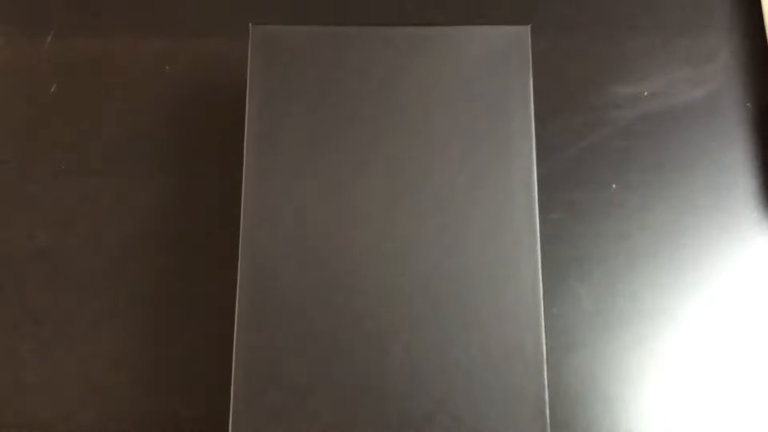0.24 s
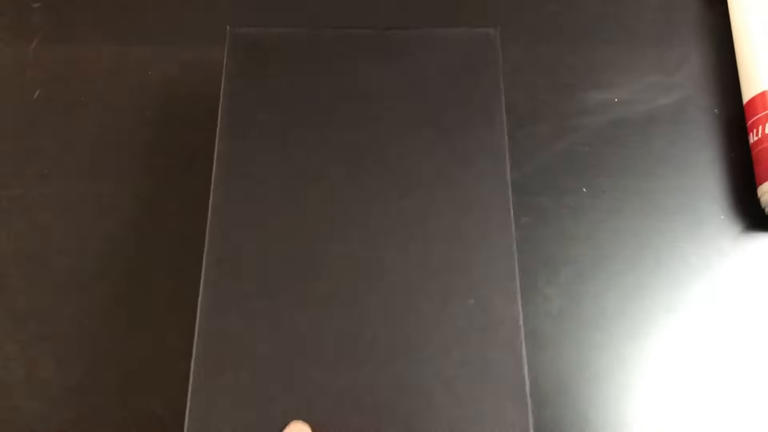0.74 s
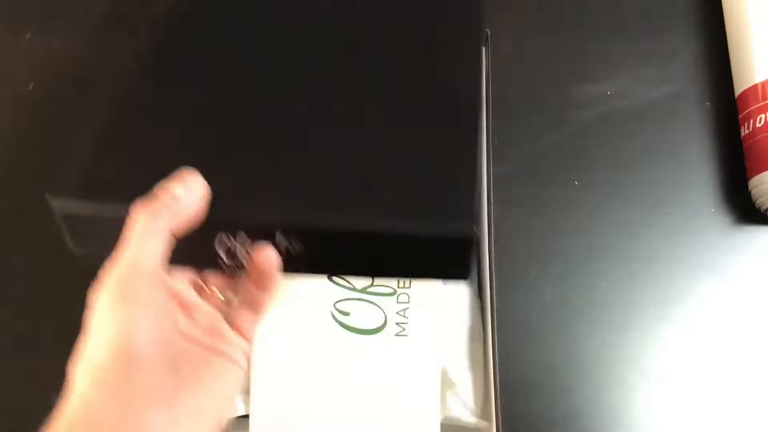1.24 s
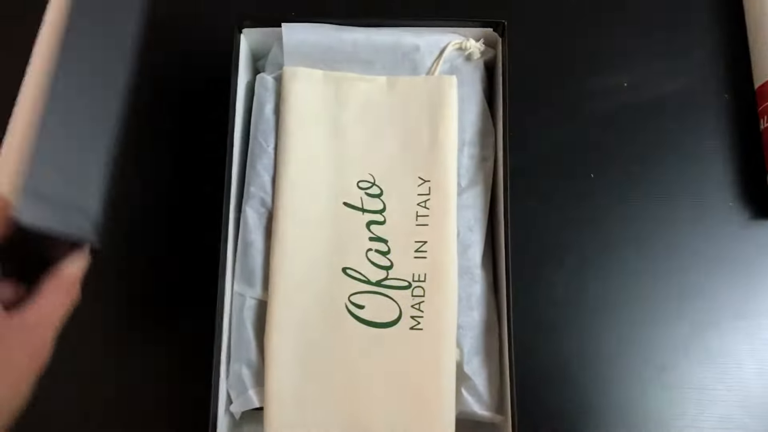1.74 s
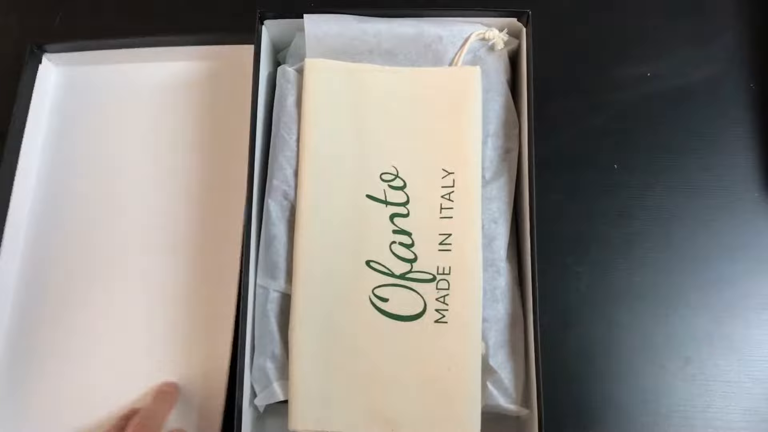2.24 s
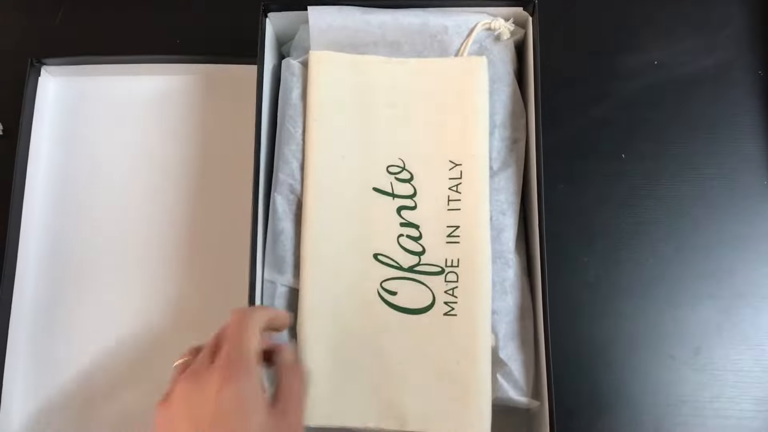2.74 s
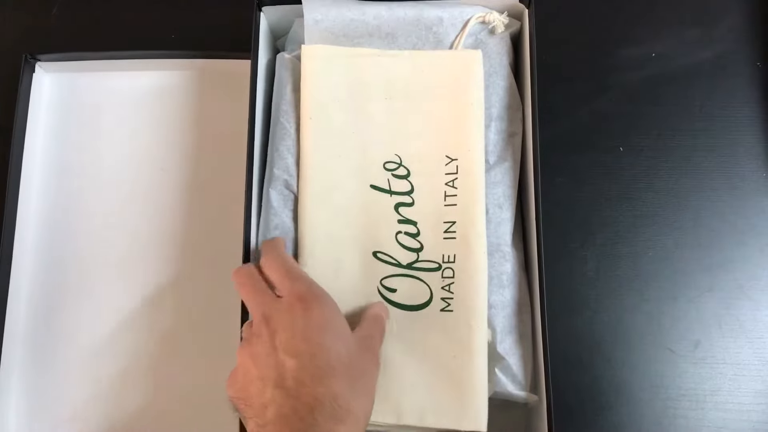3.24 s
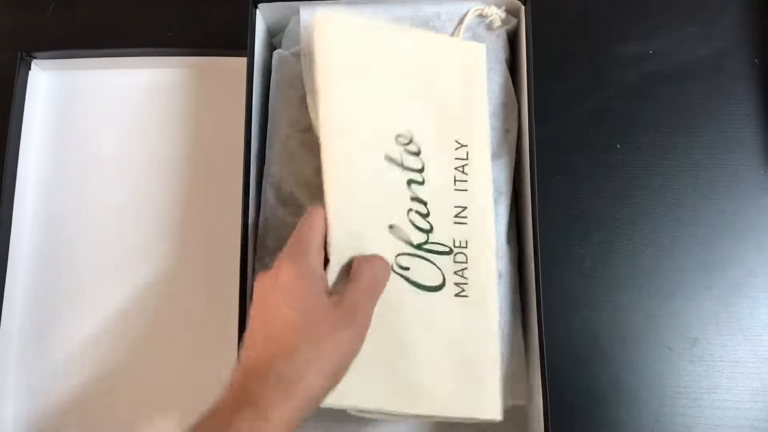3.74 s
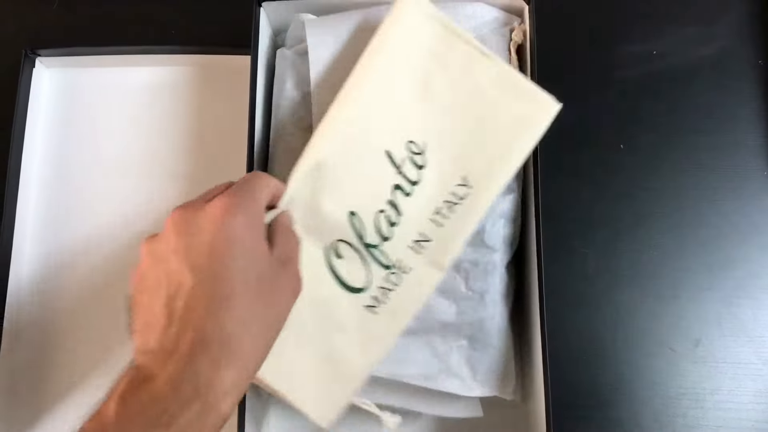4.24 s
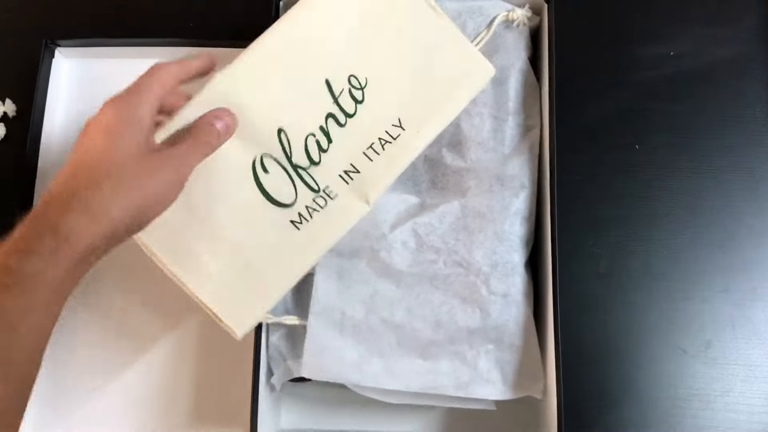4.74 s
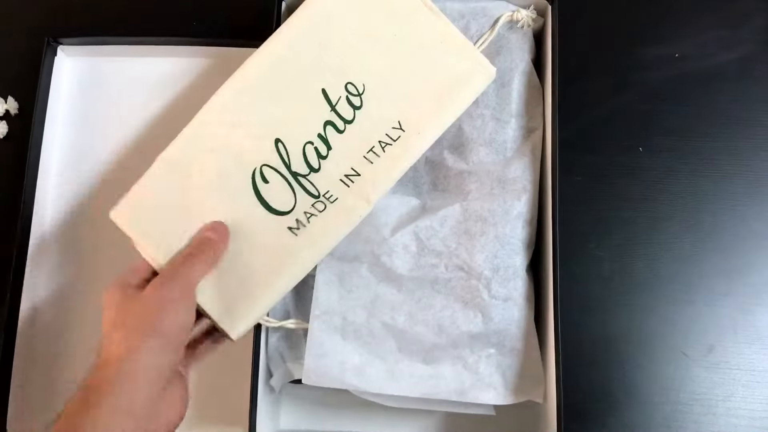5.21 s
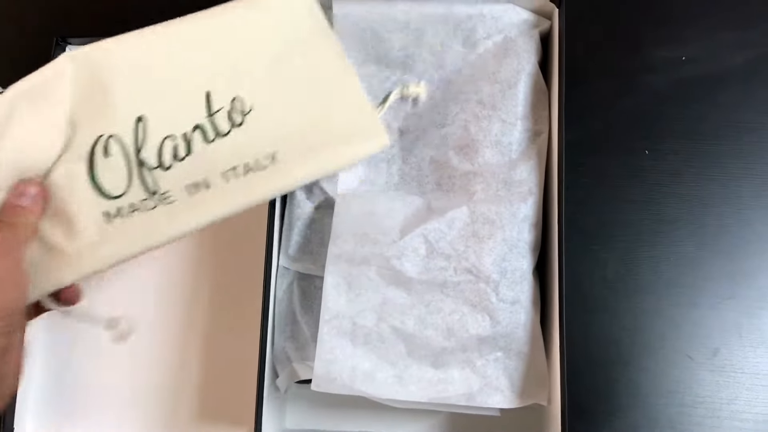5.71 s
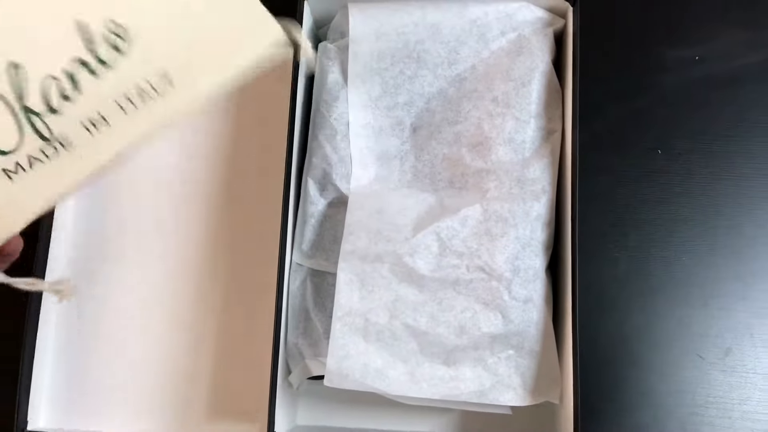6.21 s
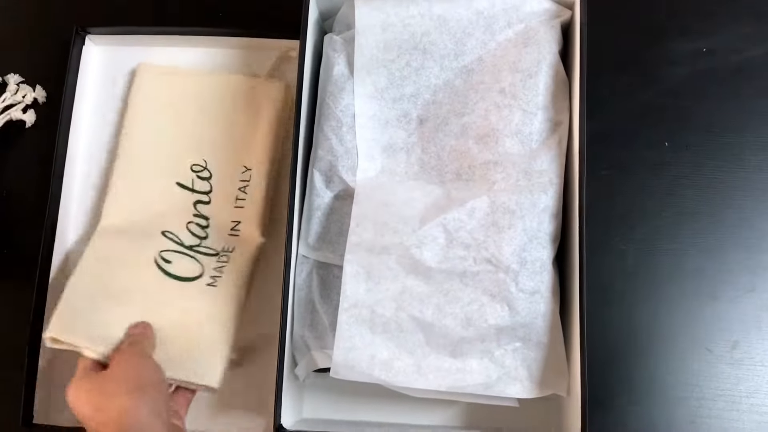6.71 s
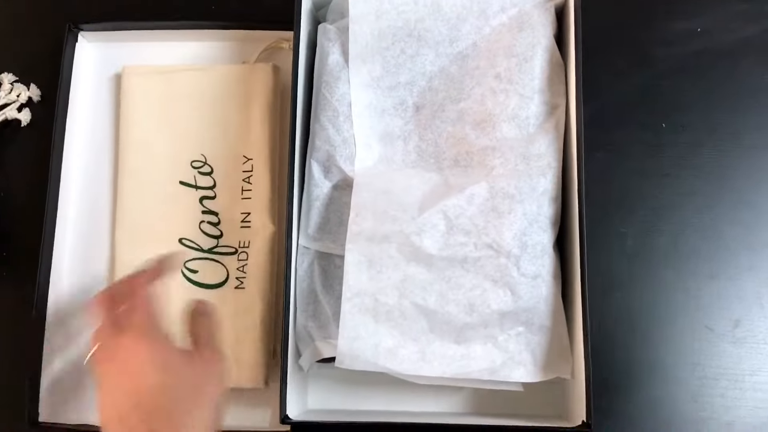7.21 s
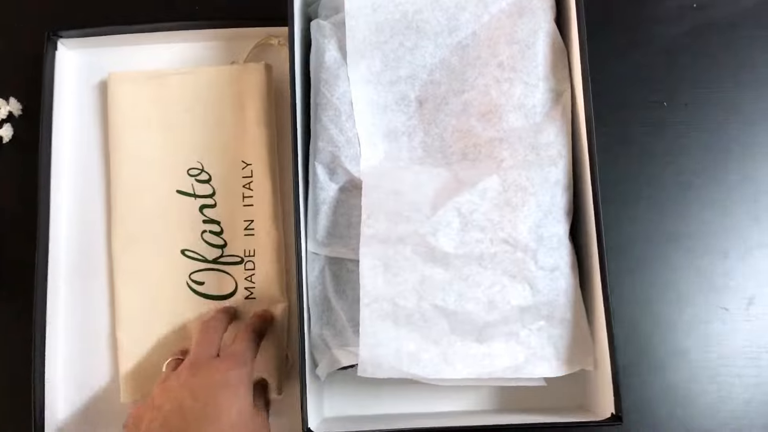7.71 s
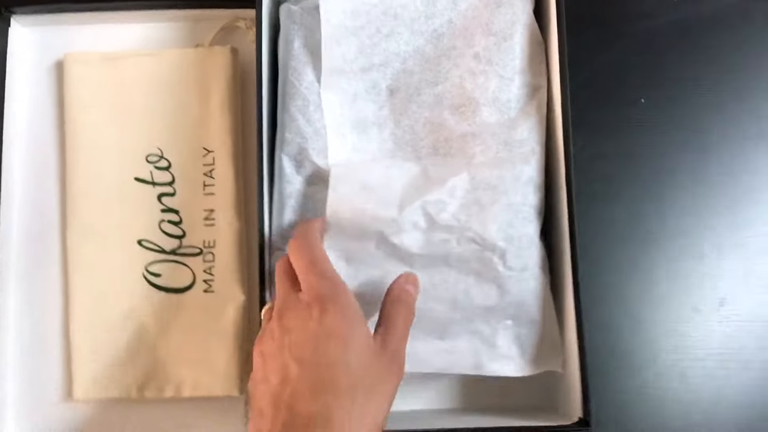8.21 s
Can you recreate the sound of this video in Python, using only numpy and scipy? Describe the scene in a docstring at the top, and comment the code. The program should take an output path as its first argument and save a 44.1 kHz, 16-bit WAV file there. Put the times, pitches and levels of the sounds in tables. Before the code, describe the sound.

A cardboard box lid comes off with hollow knocks, then tissue paper crinkles as a cloth bag is dragged across it.

```python
"""Shoe box and tissue paper

A hand lifts the lid off a cardboard shoe box, sets it on the table, then drags a cloth bag over tissue.
The paper crackles in bursts of tiny creases, dotted with sharp cracks. Knocks and scuffs ring the hollow
box, later the open lid, while the table carries the handling as deep bass. A quiet room answers."""
import sys
import numpy as np
from scipy import signal
from scipy.fft import rfft, irfft
from scipy.io import wavfile
from scipy.ndimage import uniform_filter1d

SR = 44100
rng = np.random.default_rng(int(sys.argv[2]) if len(sys.argv) > 2 else 0)


def bounce(signal):
    """Save signal as a 16-bit WAV file at the path given by the first command-line argument."""
    frames = np.transpose(np.atleast_2d(signal))
    limited = np.clip(frames, -1, 1)
    pcm = np.round(limited * 32767).astype(np.int16)
    wavfile.write(sys.argv[1], SR, pcm)


N = 373086
T = np.arange(N) / SR
LID_OFF_S = 1.6  # here card gives way to tissue, and the closed box to the open lid
TOP_HZ = 15750

# long hand strokes: along the lid, settling it, dragging the bag, lifting it clear, laying it in the lid,
# reaching for the tissue; each is (flutter share/dB, [(t/s, level/dB)])
HAND_STROKES = [(-4.5, [(0.0, -65), (.19, -63.5), (.45, -78), (.75, -59), (1.04, -50), (1.18, -60.5),
                (1.22, -63), (1.6, -77.5)]), (0.5, [(1.98, -75.5), (2.24, -62), (2.75, -82.5),
                (3.22, -82)]), (-6, [(3.27, -53.5), (3.6, -33), (3.8, -40), (4.07, -46), (4.19, -34.5),
                (4.43, -37), (4.45, -50), (4.52, -42.5), (4.64, -45), (4.8, -49), (4.94, -51.5),
                (4.98, -64), (5.11, -78)]), (-10, [(5.28, -84), (5.31, -57), (5.4, -49.5), (5.56, -47),
                (5.9, -52.5), (6.03, -59.5), (6.29, -56.5), (6.34, -95)]), (-1.5, [(6.47, -90), (6.56, -72),
                (6.7, -72)]), (-3.5, [(6.81, -80), (7.75, -81.5), (8.12, -67.5), (8.22, -50.5),
                (8.46, -52.5)])]
# folds giving way in a crunch: (t/s, hold/s, level/dB)
FOLD_CRUNCHES = [(.46, 0.024, -69), (1.3, 0.017, -71), (1.43, 0.012, -63.5), (1.72, 0.011, -71),
                 (1.81, 0.039, -72.5), (2.165, 0.017, -76), (2.315, 0.016, -53.5), (2.47, 0.09, -54.5),
                 (2.57, .03, -50), (2.805, .02, -67), (2.845, 0.025, -63), (2.94, 0.011, -63),
                 (3.0, 0.02, -42.5), (3.115, 0.0092, -57), (3.155, 0.0054, -54.5), (3.305, 0.056, -36),
                 (3.46, 0.064, -36.5), (3.59, .02, -34.5), (3.67, 0.014, -45), (3.72, 0.017, -31.5),
                 (3.775, 0.01, -33.5), (3.83, 0.018, -33), (3.88, 0.015, -31.5), (3.94, 0.049, -27),
                 (4.115, 0.031, -31.5), (4.47, .03, -36), (4.685, 0.005, -39), (4.73, 0.029, -36.5),
                 (5.58, 0.011, -57), (5.675, 0.019, -44), (6.05, .03, -55.5), (6.19, .015, -54),
                 (6.525, 0.047, -63), (8.15, 0.021, -60.5), (8.265, 0.044, -42.5)]
# tone of fingers and lid edge sliding on card: (f/Hz, level/dB)
CARD_EQ = [(350, -28.5), (600, -1), (779, -5), (1160, -1), (1730, -7), (2340, -6), (2700, -13), (3700, -5),
           (4400, -8.5), (4910, -12), (10300, -14), (12800, -15), (16000, -11.5)]
# tone of tissue paper: (f/Hz, level/dB)
TISSUE_EQ = [(90, -30.5), (140, -2.5), (387, -2.5), (456, -5.5), (683, -2.5), (851, -3), (1370, -5),
             (2860, -6.5), (3490, -4.5), (7680, -9), (9400, -6.5), (10300, -11.5), (13100, -6.5),
             (15100, -12), (16000, -3.5)]
# crossovers between patches of the sheet, large to small: f/Hz
PATCH_EDGES = [900, 1400, 1900, 2500, 3200, 4000, 5000, 6500, 8500, 11500]
# fingers and cloth scuffing the cardboard: (t/s, hold/s, level/dB)
CARD_SCUFFS = [(0.0, 0.24, -60.5), (.5, 0.29, -59.5), (.85, 0.24, -45.5), (2.24, 0.21, -45.5),
               (2.8, 0.24, -63.5), (3.5, 0.53, -55.5), (4.15, .3, -61.5), (4.75, .22, -67),
               (5.42, 0.21, -62.5), (6.3, 0.06, -61), (7.56, 0.065, -68), (8.0, .4, -68.5)]
# modes of the closed box: (f/Hz, level/dB, free t60/s)
BOX_MODES = [(138, -2, 0.28), (180, -5, 0.37), (241, 1.5, 0.15), (336.3, 0, 0.23), (494, -4, 0.12),
             (576, -4, 0.045), (877, -22, 0.15), (1120, -37, 0.068)]
# modes of the lid on the table: (f/Hz, level/dB, free t60/s)
LID_MODES = [(142.3, -6.5, 0.46), (177.5, -6.5, 0.38), (220.7, -1.5, 0.19), (245, -14, 0.069),
             (267.8, -3.5, 0.21), (325.8, -4.5, 0.3), (398, -10, 0.11), (389.9, 2.5, 0.25),
             (477.5, -9, 0.22873), (524, -10.5, 0.56), (597, -3.5, 0.23), (683, -0.5, 0.16),
             (876, -7, 0.36), (1080, -2.5, 0.091), (1320, -24, .15), (1503, -20, 0.097),
             (1722, -28, 0.14574)]
# tone of the quiet room: (f/Hz, level/dB)
AIR_EQ = [(15, -45.5), (25, 10), (59, -0.5), (277, -9), (354, -5), (531, -22), (840, -20.5), (1290, -19.5),
          (1790, -23), (6210, -30), (10400, -32.5), (14000, -29.5), (16000, -36.5)]
# blows on the cardboard: (t/s, level/dB, favoured f/Hz, share of free t60, slap offset/dB, slap f/Hz)
CARD_KNOCKS = [(.211, -30.5, 295, 0.26, -12.5, 524), (.698, -42, 284, 0.57, -7, 900),
               (.742, -38, 150, 0.7, -8, 1290), (.849, -23.5, 244, 0.44, -16, 800),
               (.857, -19.5, 246, 0.24, -10, 764), (.898, -17.5, 237, 0.7, -14, 835),
               (.913, -20, 181, 0.3, -29, 1040), (.926, -20, 326, 0.55, -33, 850),
               (2.034, -6.5, 372, 0.16, -12, 1690), (2.047, -12, 230, 0.75, -10.5, 1200),
               (2.326, -22.5, 197, 0.33, -12.5, 1057), (2.455, -35, 395, 1, -3.5, 810),
               (2.544, -28.5, 397.7, 0.65, 1, 990), (2.563, -23, 355, 1, 0.5, 945),
               (2.576, -10.5, 370, 0.14, -7, 1150), (2.588, -11, 284, 0.5, -10, 1100),
               (2.811, -38, 150, 0.4, -2, 900), (2.837, -37, 268, 0.57, 3, 1120),
               (2.886, -42.5, 180, 0.22, -14, 800), (3.304, -39, 623, 0.34, 10.5, 1600),
               (5.496, -38, 703, 0.35, 1, 910), (6.332, -38, 550, 0.43, -2, 830),
               (6.49, -27.5, 390, 0.43, -4.5, 1450), (6.524, -39.5, 378, 1, 1.5, 1350),
               (7.61, -49.5, 387, 1, -8, 812.4), (8.091, -46.5, 139, 0.4, -14, 886),
               (8.245, -43, 620, 0.15, 4.5, 800)]
# handling bumps through the table: (t/s, hold/s, level/dB)
TABLE_BUMPS = [(.7, .1, -53), (.85, 0.045, -43), (1.12, 0.027, -55), (2.04, .03, -47), (2.42, 0.05, -62),
               (2.83, 0.054, -51.5), (3.28, 0.099, -53.5), (3.55, 0.046, -49), (4.5, .05, -71),
               (5.44, 0.067, -61), (8.25, 0.032, -59.5)]
# sharp cracks in the tissue, crease snaps and sudden starts of crackle bursts: (t/s, level/dB, centre f/Hz)
TISSUE_CRACKS = [(2.0331, -39.5, 9000), (2.3213, -41, 3530), (2.5114, -36.5, 7640), (2.5754, -36, 3280),
                 (2.5875, -42, 6000), (2.8358, -39.5, 3130), (3.0027, -23.5, 5210), (3.0071, -26, 3170),
                 (3.273, -36, 3625), (3.3036, -21, 3960), (3.321, -26, 3240), (3.34, -36, 3360),
                 (3.3614, -25.5, 3150), (3.4336, -32, 4010), (3.463, -26.5, 3280), (3.5964, -24.5, 3540),
                 (3.6701, -24, 5380), (3.68, -24, 4270), (3.69, -28, 3958), (3.7264, -19, 3345),
                 (3.8295, -30, 3480), (3.8796, -31, 8570), (3.9014, -25, 3390), (3.9345, -20, 3720),
                 (4.116, -28, 5150), (4.2242, -24.5, 3450), (4.3332, -23.5, 9555), (4.3535, -29, 3510),
                 (4.389, -24, 4000), (4.4243, -23.5, 3582), (4.466, -21.5, 4140), (4.595, -28, 4530),
                 (4.638, -29.5, 5270), (4.7346, -23, 8500), (4.7945, -30, 3420), (4.8944, -36, 4040),
                 (5.5842, -30, 5721), (5.6652, -36, 5830), (5.681, -28.5, 4020), (5.9216, -34.5, 3959),
                 (6.0418, -43, 5140), (6.0553, -32.5, 10920), (6.0644, -36.5, 2200), (6.0901, -30.5, 6070),
                 (6.1937, -31.5, 4214), (8.1558, -31.5, 5500), (8.2714, -33, 3760), (8.304, -27, 4230),
                 (8.3379, -24.5, 9500), (8.3589, -28.5, 3570)]
# reverb time of the room: (f/Hz, t60/s)
ROOM_DECAY = [(150, 0.31), (1000, 0.58), (4000, 0.35), (12000, 0.35)]


def undb(db):
    """Decibels to gain."""
    return 10 ** (np.asarray(db) / 20)


def unit(x):
    """Scale to rms 1."""
    return x / np.sqrt(np.mean(x ** 2))


def decay(t, t60):
    """Envelope that falls 60 dB in t60 seconds."""
    return 1000 ** (-t / t60)


def add(out, start_s, x):
    """Mix in a one-shot."""
    i = int(start_s * SR)
    out[i:i + len(x)] += x[:N - i]


def filtered(x, kind, hz, order=2):
    """Butterworth low-, high- or band-pass."""
    return signal.sosfilt(signal.butter(order, hz, kind, fs=SR, output="sos"), x)


def eq(x, points):
    """Minimum-phase EQ through (f/Hz, level/dB) points."""
    size = 4096
    hz, db = np.transpose(points)
    f = np.arange(size // 2 + 1) * SR / size + 1
    cepstrum = irfft(np.interp(np.log(f), np.log(hz), db) * np.log(10) / 20)
    cepstrum[1:size // 2] *= 2
    cepstrum[size // 2 + 1:] = 0
    return signal.fftconvolve(x, irfft(np.exp(rfft(cepstrum))))[:len(x)]


def fader(points):
    """Automation curve through (t/s, value) points."""
    return np.interp(T, *np.transpose(points))


def wander(rate_hz):
    """Glides between random values, rms 1."""
    step = int(SR / rate_hz)
    held = np.repeat(rng.standard_normal(N // step + 1), step)
    return unit(uniform_filter1d(held, step)[:N])


def swells(events, rise_db_per_s, fall_db_per_s, rest_db):
    """Level in dB of events that rise, hold and fall over a resting level."""
    power = undb(2 * rest_db) * np.ones(N)
    for start_s, hold_s, db in events:
        near = slice(max(int((start_s - 1) * SR), 0), int((start_s + hold_s + 1) * SR))
        t = T[near] - start_s
        drop_db = np.maximum(-rise_db_per_s * t, fall_db_per_s * (t - hold_s))
        power[near] += undb(2 * (db - np.maximum(drop_db, 0)))
    return 10 * np.log10(power)


def burst(envelope, hz, span, click):
    """A click and shaped noise in the band hz / span to hz * span; peak 1."""
    noise = envelope * rng.standard_normal(len(envelope))
    noise[1] += click
    noise = filtered(noise, "band", [hz / span, min(hz * span, TOP_HZ)])
    return noise / np.abs(noise).max()


def crackle(per_s, spread_db, tail_s, burst_db, slide):
    """Creases of very unequal size, each with a noisy tail, over a sliding hiss; all in bursts."""
    onsets = rng.random(N) < per_s / SR
    size_db = spread_db * np.minimum(rng.exponential(size=N), 4.8)
    power = signal.lfilter([1], [1, -np.exp(-2 / (tail_s * SR))], onsets * undb(2 * size_db))
    envelope = np.sqrt(power / power.mean() + slide)
    return envelope * undb(burst_db * wander(rate_hz=45)) * rng.standard_normal(N)


def patches(x, depth_db, rate_hz):
    """Patches of the sheet work unevenly, so the colour keeps shifting."""
    lows = [signal.sosfiltfilt(signal.butter(2, hz, fs=SR, output="sos"), x) for hz in PATCH_EDGES]
    bands = np.diff([0 * x, *lows, x], axis=0)
    return sum(undb(depth_db * wander(rate_hz)) * band for band in bands)


def rustle():
    """Strokes and crunching folds crackle on card, then tissue; the harder, the brighter."""
    stroke_db = fader([point for _, stroke in HAND_STROKES for point in stroke])
    level_db = swells(FOLD_CRUNCHES, rise_db_per_s=506.5, fall_db_per_s=301.5, rest_db=stroke_db)
    share_db = fader([(s, db) for db, stroke in HAND_STROKES for s, _ in stroke])
    flutter_db = np.minimum(share_db - 0.27 * (level_db + 61), 4.5)  # loud strokes thin the low flutter
    grain = crackle(per_s=700, spread_db=3, tail_s=0.00084, burst_db=2.1, slide=0.8)
    grain = patches(grain, depth_db=3.5, rate_hz=14)
    grain = np.where(T < LID_OFF_S, unit(eq(grain, CARD_EQ)), unit(eq(grain, TISSUE_EQ)))
    flutter, crisp = (unit(filtered(grain, kind, hz=2700)) for kind in ("low", "high"))
    return undb(level_db) * (crisp - undb(flutter_db) * flutter)  # minus: no notch at the crossover


def ring(modes, favour_hz, t60_share, focus_db):
    """Hollow ring of struck card; the spot touched favours one pitch, by focus_db an octave."""
    t, out = T[:SR // 2], 0
    scatter_db, detune = 1.5, 0.007  # no two touches ring alike
    for hz, db, free_t60 in modes:
        weight, shift, polarity = rng.standard_normal(3)
        octaves_off = min(abs(np.log2(hz / favour_hz)), 1.5)
        gain = np.sign(polarity) * undb(db + scatter_db * weight - focus_db * octaves_off)
        tone = np.sin(2 * np.pi * hz * (1 + detune * shift) * t)
        out += gain * tone * decay(t, np.clip(t60_share * free_t60, 0.01, 0.4))
    return out


def scuffs():
    """Grainy friction of fingers and cloth rings the closed box, later the open lid."""
    rub = crackle(per_s=300, spread_db=2.2, tail_s=0.0039, burst_db=1.4, slide=0.94)
    box = signal.fftconvolve(rub, ring(BOX_MODES, favour_hz=328, t60_share=0.55, focus_db=11))[:N]
    lid = signal.fftconvolve(rub, ring(LID_MODES, favour_hz=390, t60_share=0.55, focus_db=11))[:N]
    level_db = swells(CARD_SCUFFS, rise_db_per_s=140.5, fall_db_per_s=89, rest_db=-78)
    return undb(level_db) * np.where(T < LID_OFF_S, unit(box), unit(lid))


def room_tone():
    """A steady bed of low air and faint hiss."""
    air = eq(rng.standard_normal(N), AIR_EQ)
    return undb(-65) * unit(filtered(air, "high", hz=40))


def knocks():
    """Each blow rings the box or lid and slaps its flat face, whose dense modes die as noise."""
    out, t = np.zeros(N), T[:SR // 5]
    push = np.hanning(int(0.00073 * SR))  # soft contact, just under a millisecond
    for start_s, db, favour_hz, t60_share, slap_db, slap_hz in CARD_KNOCKS:
        modes = BOX_MODES if start_s < LID_OFF_S else LID_MODES
        body = signal.fftconvolve(ring(modes, favour_hz, t60_share, focus_db=8), push)
        add(out, start_s, undb(db) * body / np.abs(body).max())
        envelope = np.minimum(t / 0.0011, 1) * (decay(t, 0.021) + 0.36 * decay(t, 0.5 * t60_share))
        slap = burst(envelope, slap_hz, span=1.52, click=1.2)
        slap = filtered(slap, "low", hz=3600)  # card is too soft to slap in the treble
        add(out, start_s, undb(db + slap_db) * slap)
    return out


def table_bumps():
    """The table carries the handling as soft, wavering deep bass."""
    level_db = swells(TABLE_BUMPS, rise_db_per_s=400, fall_db_per_s=154.5, rest_db=-73)
    level_db += 2.8 * wander(rate_hz=4.3)
    return undb(level_db) * unit(filtered(rng.standard_normal(N), "band", hz=[42, 85]))


def cracks():
    """A sharp crack as a crease snaps or a crackle burst starts, then the sheet shivers."""
    out, t = np.zeros(N), T[:SR // 10]
    envelope = np.minimum(t / 0.0012, 1) * (decay(t, 0.016) + 0.19 * decay(t, 0.04))
    for start_s, db, hz in TISSUE_CRACKS:
        add(out, start_s, undb(db) * burst(envelope, hz, span=2.9, click=1.6))
    return out


def reverb(x):
    """The room answers with a short noise tail that hangs longest in the mids."""
    t, tail = T[:SR // 2], 0
    f, t60 = np.transpose(ROOM_DECAY)
    for hz in 60 * 2. ** np.arange(8):
        octave = filtered(rng.standard_normal(len(t)), "band", [hz, 2 * hz], order=1)
        tail += octave * decay(t, np.interp(np.log(hz), np.log(f), t60))
    tail *= np.minimum(t / 0.0081, 1)
    return undb(-11) * signal.fftconvolve(x, tail / np.sqrt(np.sum(tail ** 2)))[:N]


def scene():
    """Paper and cardboard up close in a quiet room, in mono."""
    paper = rustle() + cracks()
    cardboard = filtered(knocks() + scuffs(), "high", hz=130)  # a small panel radiates no deep bass
    close = paper + cardboard
    return (close + reverb(close) + table_bumps() + room_tone())[None]


def record(dry):
    """A steep high cut takes off the very top."""
    return signal.sosfilt(signal.ellip(12, .2, 70, TOP_HZ, fs=SR, output="sos"), dry)


dry = scene()
out = record(dry)
bounce(out)
```